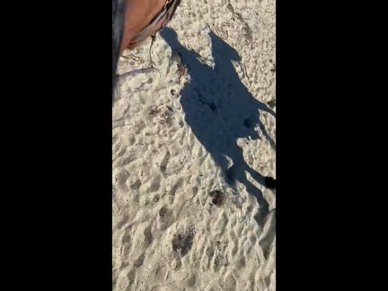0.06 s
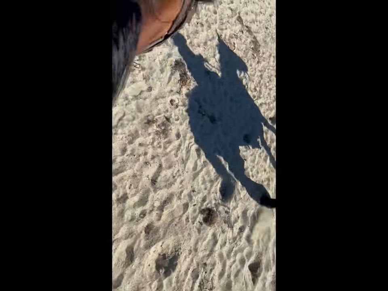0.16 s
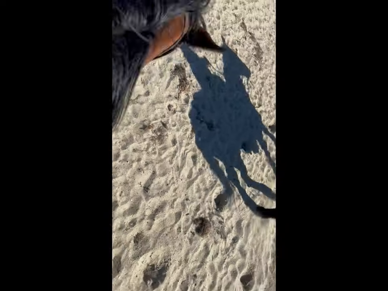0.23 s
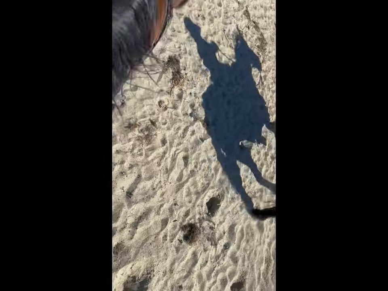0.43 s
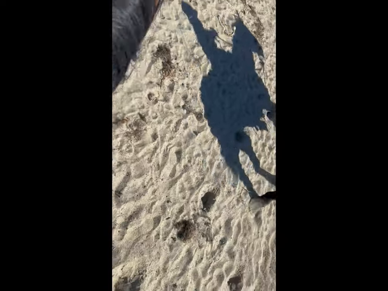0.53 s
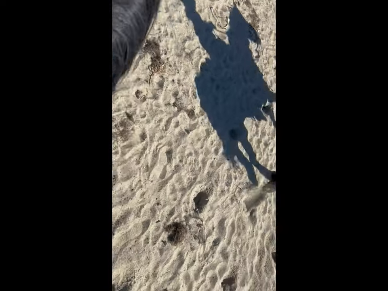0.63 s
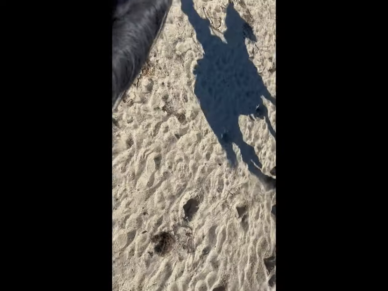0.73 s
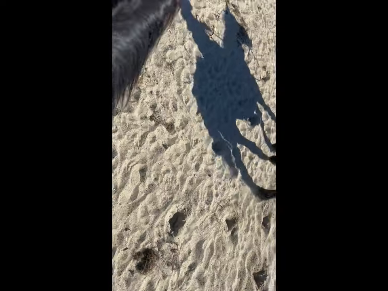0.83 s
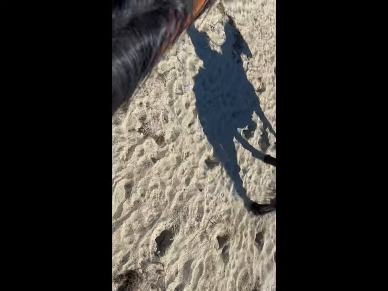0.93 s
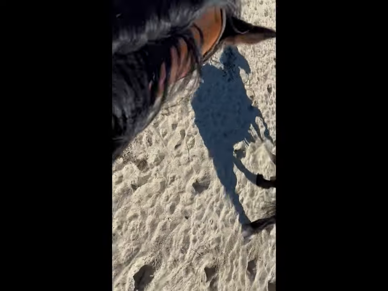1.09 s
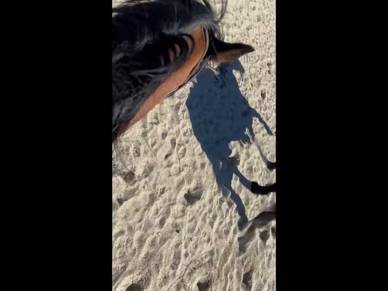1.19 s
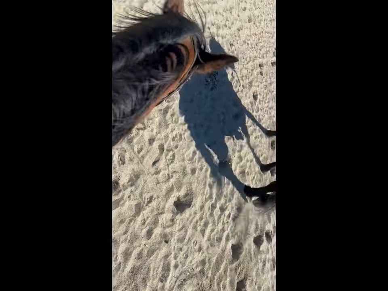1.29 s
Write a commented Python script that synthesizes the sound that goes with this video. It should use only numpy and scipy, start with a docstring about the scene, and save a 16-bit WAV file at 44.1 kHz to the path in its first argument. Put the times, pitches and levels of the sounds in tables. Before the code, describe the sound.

Outdoors on sand, a horse blows one loud, close snort, a breathy flapping burst that slows and dies away. Behind it are a low wind rumble, soft thumps, a faint sandy hiss and a far-off wash like surf.

```python
"""In the open air, on sand, a ridden horse snorts once, close by. Turbulent air excites the resonances of
its nose while the nostrils flap: each closing interrupts the flow, first with dull thuds, then with bright
slaps that slow down as the blow runs out. Behind it are wind rumble, a distant surf-like wash, a faint hiss
of sand, soft low thumps and tiny dry ticks, as of sand grains."""
import sys
import numpy as np
from scipy import signal
from scipy.fft import rfft, irfft, next_fast_len
from scipy.io import wavfile
from scipy.ndimage import uniform_filter1d, minimum_filter1d, map_coordinates

SR = 44100
rng = np.random.default_rng(int(sys.argv[2]) if len(sys.argv) > 2 else 0)


def store_wav(level_fs):
    """Save 16-bit WAV to argv[1]."""
    pcm = np.round(np.clip(np.atleast_2d(level_fs), -1, 1) * 32767)
    wavfile.write(sys.argv[1], SR, pcm.T.astype(np.int16))


N = 59535

# Envelope of the wind (time [s], level [dB])
WIND_ENVELOPE = [(0, -40.5), (.08, -42.5), (.17, -35), (.22, -35.5), (.35, -33.5), (.48, -33.5), (.56, -39),
                 (.61, -43), (.72, -37), (.82, -37), (.88, -41), (1.05, -38), (1.18, -35), (1.29, -38.5),
                 (1.35, -38)]
# Spectrum of the wind (frequency [Hz], gain [dB])
WIND_SPECTRUM = [(15, -35.5), (28, -23.5), (42, -2.5), (70, -4.5), (110, -8), (180, -15.5), (400, -44),
                 (1000, -85)]
# Envelopes of the distant wash (time [s], low band level [dB], upper band level [dB])
WASH_ENVELOPES = [(0, -49.5, -56), (.17, -51, -55), (0.619, -51, -49.5), (.74, -46, -42.5),
                  (.86, -41.5, -43.5), (1.0, -40.5, -45.5), (1.14, -36, -45.5), (1.35, -39.5, -43.5)]
# Spectra of its low and upper bands (frequency [Hz], gain [dB])
WASH_LOW_SPECTRUM = [(60, -15), (150, 1.5), (330, 1.5), (520, 1), (660, -11.5), (1000, -22), (2500, -65)]
WASH_HIGH_SPECTRUM = [(200, -22.5), (650, -9.5), (850, -3.5), (1050, 3), (1300, -1.5), (1550, -11),
                      (1950, -3.5), (2200, -13), (2500, -29), (5000, -67)]
# Stereo width of the wash (frequency [Hz], side over mid [dB])
WASH_SPREAD = [(100, -28), (280, -26), (550, -5), (1200, -9), (1900, -18.5), (2600, -10.5), (5000, 15)]
# Spectrum of the sand hiss (frequency [Hz], gain [dB])
SAND_SPECTRUM = [(1000, -16), (2400, -5), (3300, -3), (4100, -10.5), (4900, -3), (5700, 4.5), (6500, -2.5),
                 (7500, -4), (9000, -16), (9800, -23.5), (10800, -52), (15000, -41.5)]
# Stereo width of the sand hiss (frequency [Hz], side over mid [dB])
SAND_SPREAD = [(2000, -7.5), (4500, 5), (5700, -7.5), (8000, 0.5)]
# Tiny dry ticks, as of sand grains (time [s], level [dB])
SAND_TICKS = [(0.8206, -49), (1.0909, -39.5)]
# Spectrum of a tick (frequency [Hz], gain [dB])
TICK_SPECTRUM = [(1000, -29), (2200, -6), (2600, 4.5), (3300, 1), (4000, -3), (6000, -12), (9000, -17),
                 (12000, -29.5), (15000, -25)]
# Soft low thumps; the one at 0.204 s opens the snort (time [s], level [dB], frequency [Hz])
LOW_THUMPS = [(0.019, -30, 55.7), (0.123, -30, 56.7), (0.204, -20.5, 122), (.755, -28, 60.3),
              (1.09, -28.5, 49.3), (1.176, -25.5, 61.5), (1.215, -30, 44.3)]
# Envelope of the air jet at the nostril rims, strongest early in the blow (time [s], level [dB])
JET_ENVELOPE = [(.15, -57.5), (.18, -47), (.205, -39.5), (.224, -27.5), (.25, -34), (.32, -33.5),
                (.42, -43.5), (.5, -51.5), (.55, -72)]
# Spectrum of the jet (frequency [Hz], gain [dB])
JET_SPECTRUM = [(900, -21.5), (1400, 10), (2000, 10.5), (2450, 1), (3200, -1.5), (3900, -14), (5000, -19),
                (5800, -6.5), (6600, -20), (8500, -26), (9800, -32), (11000, -60.5)]
# Narrow spectrum of the hiss of flaring nostrils (frequency [Hz], gain [dB])
FLARE_SPECTRUM = [(2300, -41), (2850, -9.5), (3150, 10), (3400, -3.5), (3700, -26), (5000, -52)]
# Force of the blow before puffs and slumps (time [s], boom level [dB], air level [dB])
BLOW_ENVELOPES = [(.15, -49, -57), (.185, -44, -49), (.202, -28.5, -33), (.214, -29.5, -18.5),
                  (.24, -12.5, -18), (.29, -13.5, -15), (.33, -18.5, -18.5), (.36, -18, -17),
                  (.44, -21, -17.5), (.495, -31.5, -23), (.53, -35, -31), (.555, -43, -51),
                  (.62, -70.5, -74)]
# Nasal resonances, nostrils open and tightened (frequency [Hz], bandwidth [Hz], gain [dB])
OPEN_NOSE_MODES = [(494, 150, -5), (760, 130, 2.5), (1020, 100, -4.5), (1450, 110, -13), (1875, 150, -6)]
NARROW_NOSE_MODES = [(473, 94, -3.5), (713, 48, -5.5), (948, 136, -0.5), (1370, 460, -6.5),
                     (1970, 150, -8.5)]
# Loss of treble round the horse's head (frequency [Hz], gain [dB])
HEAD_SHADOW = [(40, -16.5), (100, 10), (520, -1.5), (620, -5.5), (740, 1), (1040, 0.5), (1170, -9.5),
               (1300, -4.5), (2050, -5.5), (2350, -14.5), (3200, -17), (3900, -24), (5800, -24.5),
               (8000, -28.5), (10500, -57), (15000, -64.5)]
# Resonances of the hollows of the head (frequency [Hz], bandwidth [Hz], gain [dB])
CAVITY_MODES = [(117.5, 35, -3.5), (183, 48, -4), (237, 24, 5), (294.4, 17, 0.5), (484, 120, -12)]
# Passband of their low boom (frequency [Hz], gain [dB])
CAVITY_BAND = [(40, -31), (100, 1), (300, -2), (345, 0), (430, -2.5), (520, 4), (650, -3.5), (1200, -40.5)]
# Stereo width of the snort (frequency [Hz], side over mid [dB])
SNORT_SPREAD = [(100, -39.5), (250, -33.5), (500, -13.5), (750, -11.5), (1000, -14), (1350, -8),
                (1850, -12), (2300, -4), (3500, 1.5), (9000, 7.5)]
# Closings of the nostrils (time [s], thud level [dB], slap level [dB])
NOSTRIL_FLAPS = [(0.239, -7, -24), (0.2659, -3.5, -41), (.2860, -5, -37), (.3110, -18, -41.5),
                 (.3385, -2, -16), (0.3653, -5, -5), (0.391, -2.5, -2), (0.4191, -19, -5.5),
                 (0.4495, -11.5, -6), (0.4783, -9.5, -12), (.4960, -23.5, -42), (0.5173, -21, -21)]
# Spectrum of a flap's thud (frequency [Hz], gain [dB])
THUD_SPECTRUM = [(20, -17.5), (40, -3.5), (75, -13), (120, -1), (215, 3), (330, -9), (480, -6.5),
                 (800, -25.5), (1300, -48.5), (2200, -65.5), (5000, -96)]


def amp(db):
    """Amplitude ratio of a level in decibels."""
    return 10 ** (np.asarray(db) / 20)


def curves(rows):
    """Linear interpolation of each column after the time, one value per sample."""
    times, *columns = np.transpose(rows)
    return [np.interp(np.arange(N) / SR, times, column) for column in columns]


def wobble(rate_hz):
    """Smooth random modulation: a spline through Gaussian knots."""
    knots = rng.standard_normal(int(N * rate_hz / SR) + 4)
    return map_coordinates(knots, [np.arange(N) * rate_hz / SR])


def filtered(x, response):
    """Zero-phase filtering: the spectrum is multiplied by a real response."""
    size = next_fast_len(N + SR // 2)
    return irfft(rfft(x, size) * response(np.fft.rfftfreq(size, 1 / SR)), size)[..., :N]


def colour(points):
    """Magnitude response through (frequency [Hz], gain [dB]) points on a logarithmic frequency axis."""
    knots_hz, db = np.transpose(points)
    return lambda hz: amp(np.interp(np.log(hz + 1), np.log(knots_hz + 1), db))


def resonances(modes, shading):
    """Response of second-order resonators, summed in power and weighted by a shading curve."""
    def response(hz):
        power = sum(np.abs(amp(db) * hz * width / (centre ** 2 - hz ** 2 + 1j * hz * width)) ** 2
                    for centre, width, db in modes)
        return colour(shading)(hz) * np.sqrt(power)
    return response


def noise(response, spread):
    """Mid-side stereo noise of rms 1; spread lists (frequency [Hz], side over mid [dB])."""
    mid, side = filtered(rng.standard_normal((2, N)), response)
    side = filtered(side, colour(spread))
    stereo = np.array([mid + side, mid - side])
    return stereo / np.sqrt(np.mean(stereo ** 2) + 1e-20)


def steadied(x, span_s):
    """Division by the running rms evens out the chance swells of noise."""
    size = max(2, int(span_s * SR))
    power = uniform_filter1d(uniform_filter1d(np.mean(x ** 2, axis=0), size), size // 2)
    return x / np.sqrt(np.abs(power) + 1e-9)


def pulse(spectrum, size=4096):
    """Minimum-phase pulse of peak 1: folding the cepstrum makes it causal."""
    cepstrum = irfft(np.log(colour(spectrum)(np.fft.rfftfreq(size, 1 / SR))))
    cepstrum[1:size // 2] *= 2
    cepstrum[size // 2 + 1:] = 0
    shape = irfft(np.exp(rfft(cepstrum)))
    return shape / np.abs(shape).max()


def strikes(times, db, shape):
    """Convolution with an impulse train repeats a shape at each time and level."""
    train = np.bincount(np.round(times * SR).astype(int), amp(db), N)
    return signal.fftconvolve(train, shape)[:N]


def wind():
    """Gusts modulate low-frequency noise that is nearly coherent between the two sides."""
    level_db, = curves(WIND_ENVELOPE)
    return amp(level_db) * steadied(noise(colour(WIND_SPECTRUM), spread=[(50, -20)]), span_s=0.096)


def distant_wash(flicker_db=1):
    """Two amplitude-modulated noise bands add to a surf-like wash that swells after the snort."""
    wash = np.zeros((2, N))
    for level_db, spectrum in zip(curves(WASH_ENVELOPES), (WASH_LOW_SPECTRUM, WASH_HIGH_SPECTRUM)):
        envelope = amp(level_db + flicker_db * wobble(rate_hz=25))
        wash += envelope * steadied(noise(colour(spectrum), WASH_SPREAD), span_s=0.08)
    return wash


def sand_hiss(level_db=-56, flicker_db=1):
    """Fast random amplitude modulation gives the faint hiss of sand a slight grain."""
    return amp(level_db + flicker_db * wobble(rate_hz=90)) * noise(colour(SAND_SPECTRUM), SAND_SPREAD)


def sand_ticks(t60_s=0.0085):
    """Fast exponential decay turns noise bursts into tiny dry ticks, as of sand grains."""
    t = np.arange(N) / SR
    envelope = sum((t > start) * amp(db - 60 * np.abs(t - start) / t60_s) for start, db in SAND_TICKS)
    return envelope * noise(colour(TICK_SPECTRUM), spread=[(3000, -4)])


def thumps(width_s=0.014):
    """Gaussian wave packets: the snort's first dull nostril thud, and deep bumps of hooves or wind."""
    t = np.arange(N) / SR
    bass = np.zeros(N)
    for (centre_s, db, hz), phase in zip(LOW_THUMPS, rng.random(len(LOW_THUMPS))):
        envelope = amp(db) * np.exp(-((t - centre_s) / width_s) ** 2)
        bass += envelope * np.cos(2 * np.pi * (hz * (t - centre_s) + phase))
    return bass


def nostril_jet(flare_s=0.235, flare_width_s=0.035, flare_db=-39.5):
    """Jet noise: air hisses past the rims, with a half-whistled narrow band as the nostrils flare."""
    level_db, = curves(JET_ENVELOPE)
    hiss = noise(colour(JET_SPECTRUM), spread=[(2000, -14.5), (3500, 6), (5800, -4.5), (9000, 6.5)])
    whistle = noise(colour(FLARE_SPECTRUM), spread=[(3000, -2)])
    flare = amp(flare_db) * np.exp(-((np.arange(N) / SR - flare_s) / flare_width_s) ** 2)
    return amp(level_db) * hiss + flare * whistle


def flap_windows(delay_s, width_s):
    """Gaussian modulation windows of peak 1, one row per flap, each offset from its closing."""
    age = np.arange(N) / SR - np.array(NOSTRIL_FLAPS)[:, :1]
    return np.exp(-((age - delay_s) / width_s) ** 2)


def nasal_airflow(tighten_s=0.36, transition_s=0.025, puff_db=7, slump_db=5.5, pan_db=-0.5):
    """Source and filter: turbulence excites the nose and head, brightening as the nostrils tighten."""
    open_nose, narrow_nose = (steadied(noise(resonances(modes, HEAD_SHADOW), SNORT_SPREAD), span_s=0.011)
                              for modes in (OPEN_NOSE_MODES, NARROW_NOSE_MODES))
    boom = steadied(noise(resonances(CAVITY_MODES, CAVITY_BAND), SNORT_SPREAD), span_s=0.012)
    tightness = (1 + np.tanh((np.arange(N) / SR - tighten_s) / transition_s)) / 2
    air = np.sqrt(1 - tightness) * open_nose + np.sqrt(tightness) * narrow_nose  # equal-power crossfade
    # The air puffs just before each hard slap and is choked after every flap.
    _, _, slap_db = np.transpose(NOSTRIL_FLAPS)
    hardness = np.sqrt(amp(slap_db - slap_db.max()))
    boost_db = puff_db * hardness @ flap_windows(delay_s=-0.0028, width_s=0.0038)
    choke_db = slump_db * flap_windows(delay_s=0.0098, width_s=0.0034).sum(0)
    boom_db, air_db = curves(BLOW_ENVELOPES)
    blow = amp(air_db + boost_db) * air + amp(boom_db) * boom
    return blow * amp(-choke_db) * amp([[pan_db], [-pan_db]])


def nostril_flaps(slap_hz=1739, detune=0.04, lag_s=0.0007, width_s=0.00098, pan_db=0.2):
    """Valve action: each closing cuts the flow with a thud and slaps the rim, a burst of a few cycles."""
    times, thud_db, slap_db = np.transpose(NOSTRIL_FLAPS)
    thuds = strikes(times, thud_db, -pulse(THUD_SPECTRUM))
    slaps = np.zeros(N)
    for start, db in zip(times, slap_db):
        deviation, phase = rng.standard_normal(2)
        hz = slap_hz * (1 + detune * deviation)
        age = np.arange(N) / SR - start - lag_s
        slaps += amp(db) * np.exp(-(age / width_s) ** 2) * np.sin(2 * np.pi * (hz * age + phase))
    return thuds + slaps * amp([[pan_db], [-pan_db]])


def scene():
    """Superposition of the close snort and its open-air background."""
    snort = nasal_airflow() + nostril_jet() + nostril_flaps()
    return snort + wind() + distant_wash() + sand_hiss() + sand_ticks() + thumps()


def record(dry):
    """Peak limiting rounds the loudest flaps; a low-pass filter then bounds the bandwidth."""
    ceiling, smoothing_s, cutoff_hz = 0.96, 0.0015, 15800
    size = int(smoothing_s * SR)
    peak = np.abs(dry).max(0)
    held_gain = minimum_filter1d(ceiling / np.maximum(peak, ceiling), 2 * size + 1)
    gain = uniform_filter1d(uniform_filter1d(held_gain, size), size)
    return filtered(dry * gain, lambda hz: hz < cutoff_hz)


dry = scene()
out = record(dry)
store_wav(out)
```